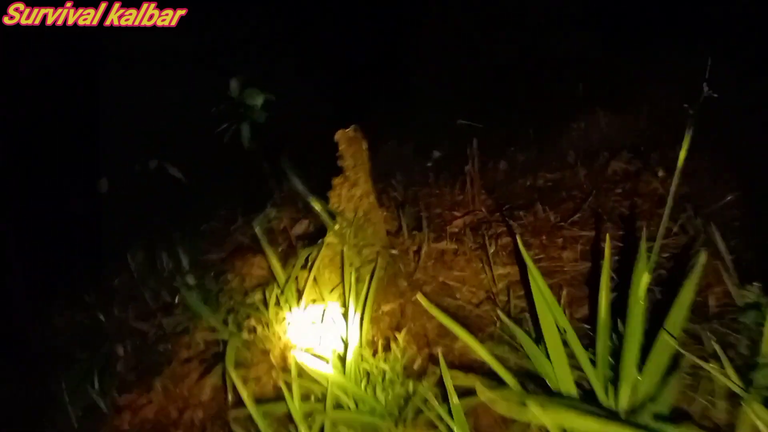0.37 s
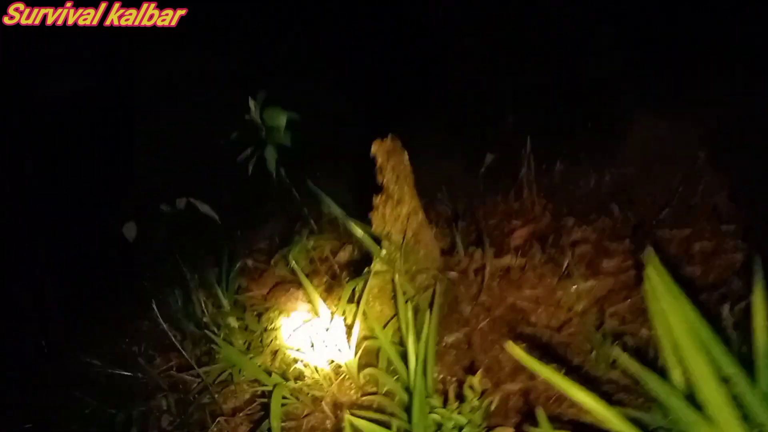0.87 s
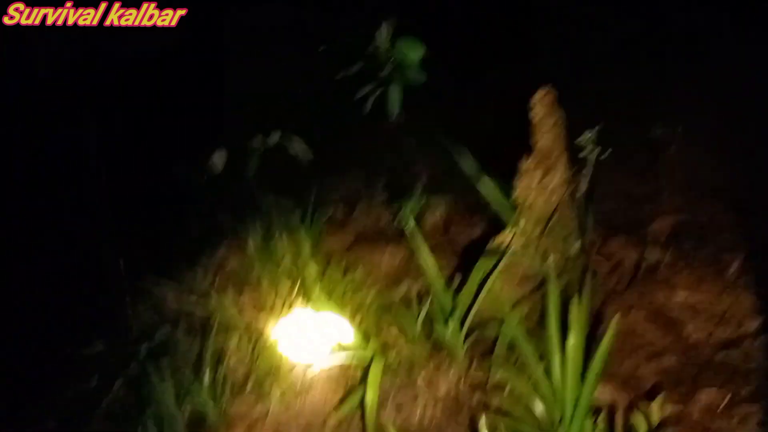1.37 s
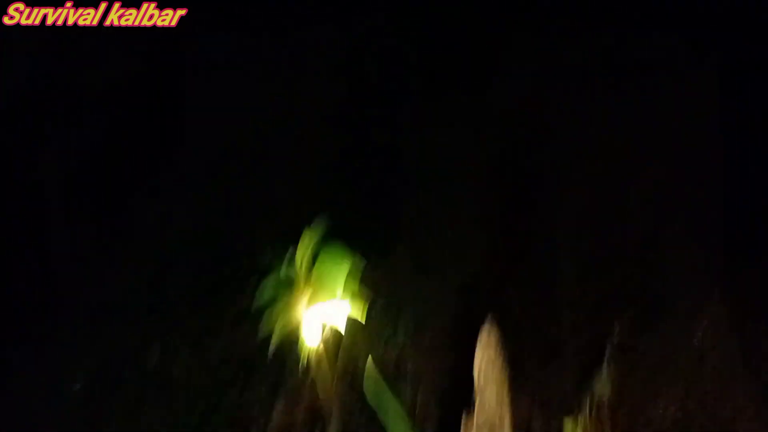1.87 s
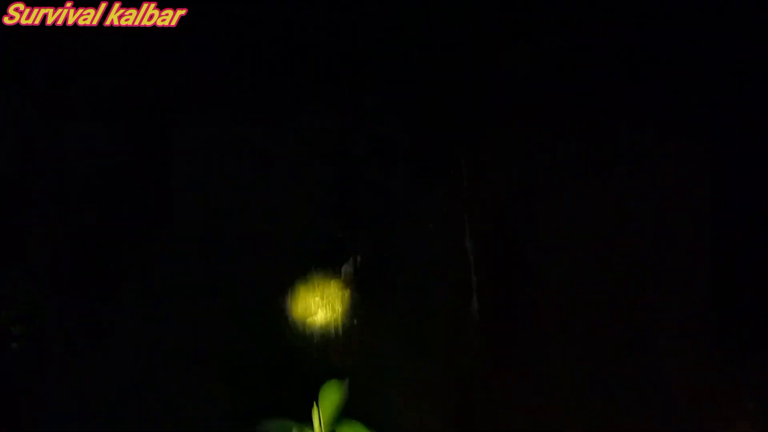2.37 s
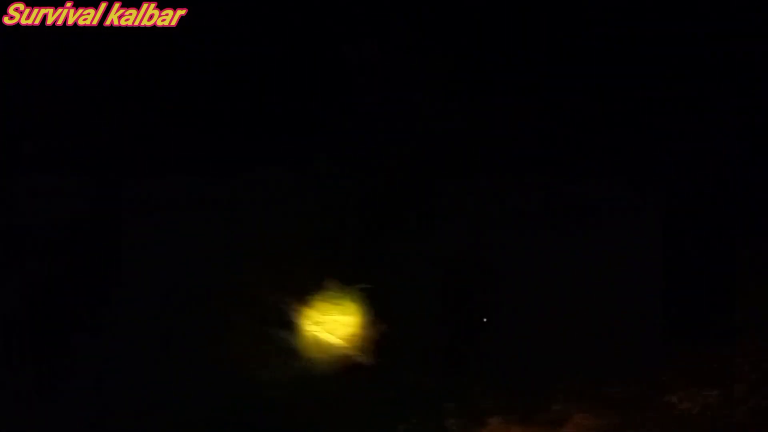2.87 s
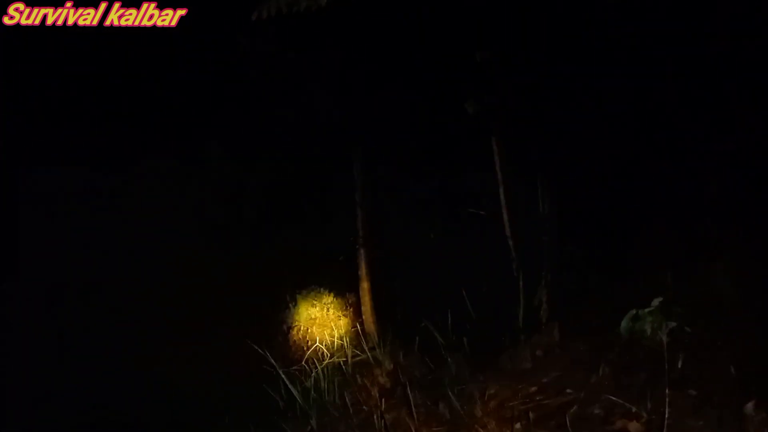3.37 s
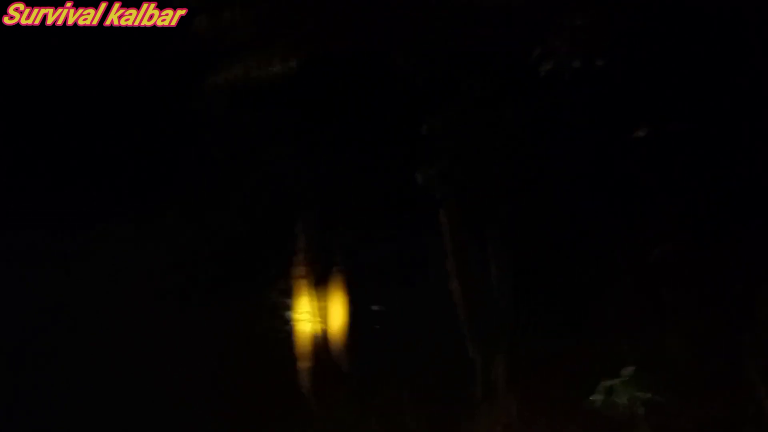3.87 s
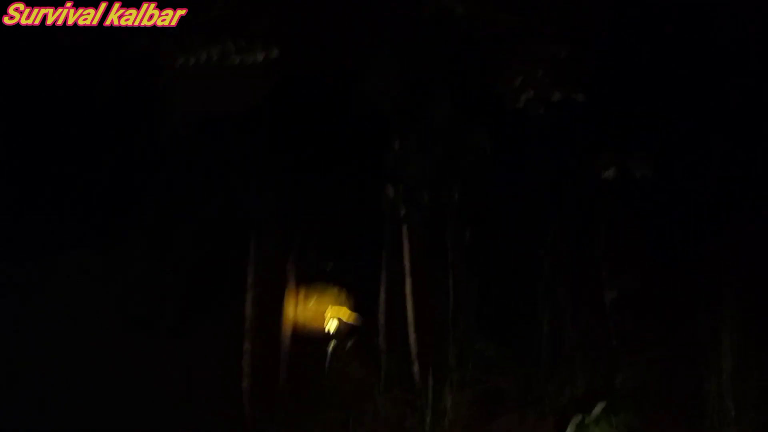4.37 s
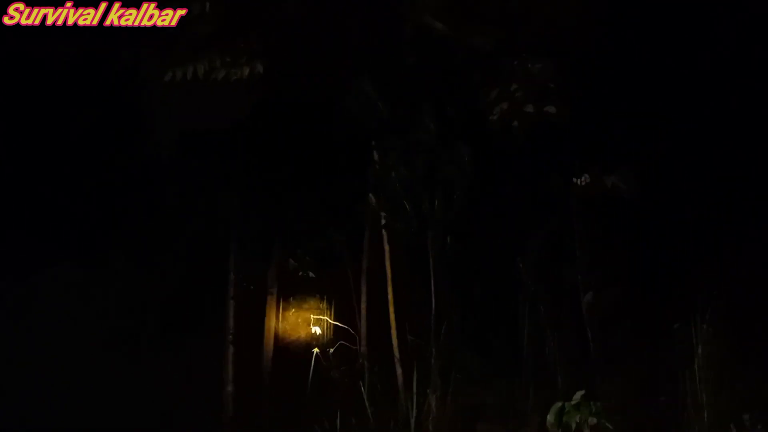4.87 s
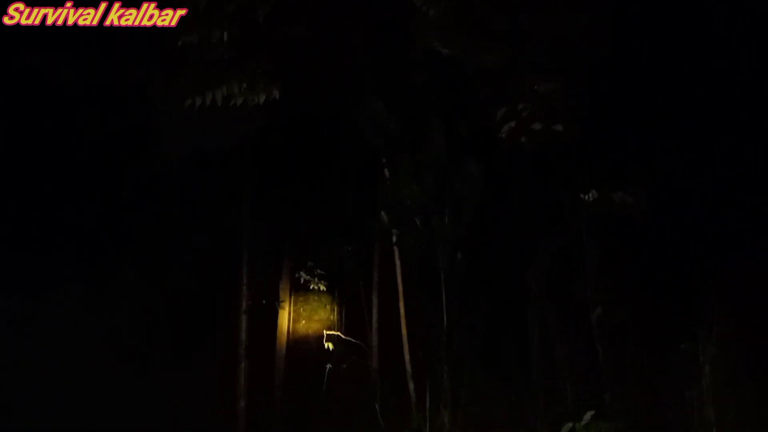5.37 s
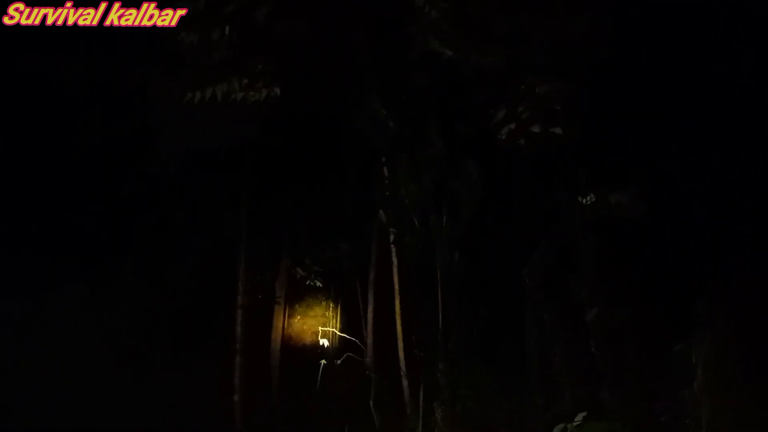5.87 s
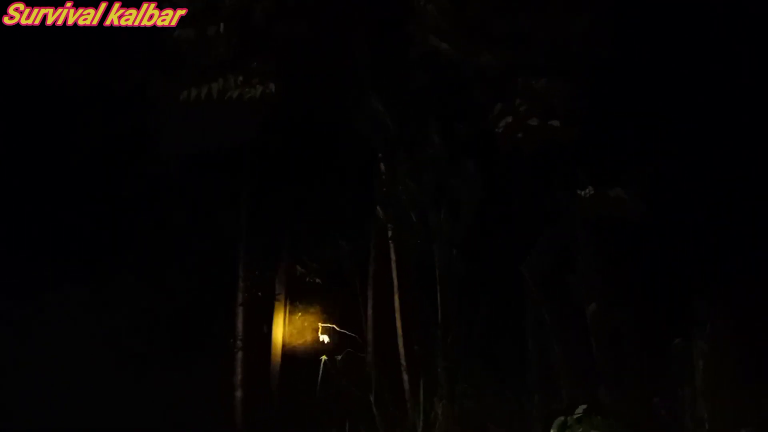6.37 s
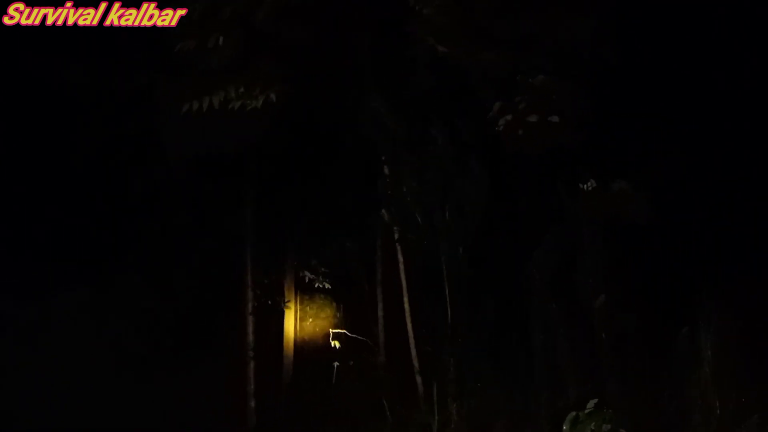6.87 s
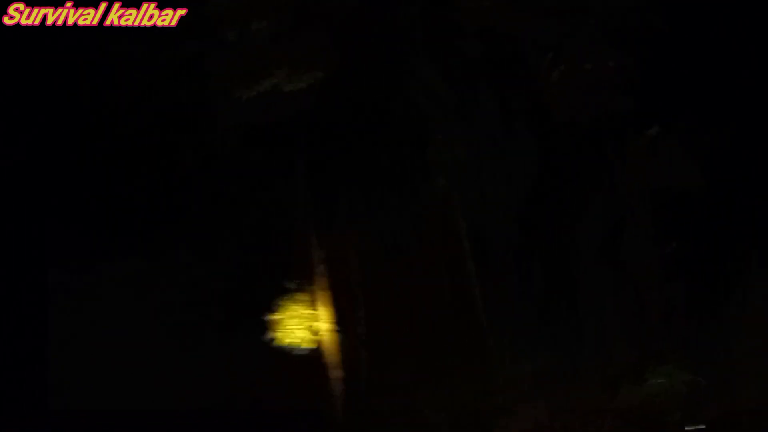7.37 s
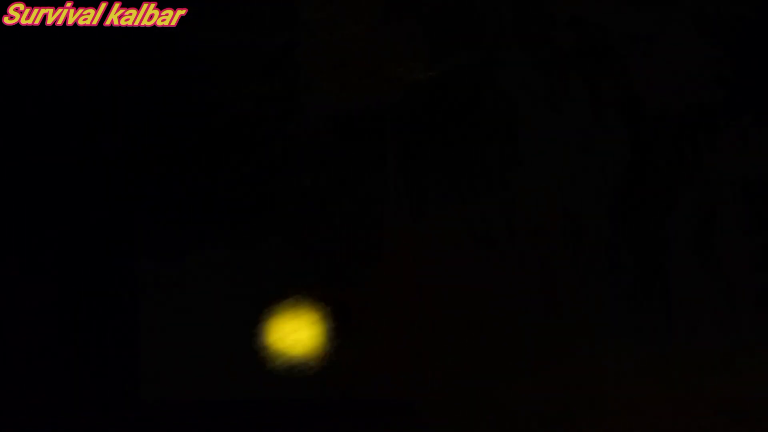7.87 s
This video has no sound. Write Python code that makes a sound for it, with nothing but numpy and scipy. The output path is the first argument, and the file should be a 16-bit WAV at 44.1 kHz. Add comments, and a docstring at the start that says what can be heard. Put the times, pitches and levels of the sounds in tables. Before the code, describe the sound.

Night forest, stereo outdoor pickup. Crickets trill constantly over a pulsing distant insect crowd, a katydid rasps in quick double buzzes, and a frog whistles a short falling note about every three quarters of a second, with a fainter answer. Early on, a close walker brushes leaves and snaps twigs, with dull handling bumps; this thins out by four seconds. A near cricket chirps rapidly at the start and end.

```python
"""A forest at night: frogs whistle falling notes, a katydid buzzes in pairs and crickets trill all through.
At first a walker brushes through the undergrowth: rubbed noise and grains, ringing twigs, low recorder jolts.
A near cricket chirps early and again late; a short frog croak, pulses into a throat, comes with each half.
Leaves squeak as thin gliding tones, once during the walk and again as the walker comes to rest.
Pulsed crowds of distant singers and coloured noise lie behind."""
import sys
import numpy as np
from scipy import signal
from scipy.io import wavfile
from scipy.ndimage import uniform_filter1d

SR = 44100
rng = np.random.default_rng(int(sys.argv[2]) if len(sys.argv) > 2 else 0)


def gain_from_db(level_db):
    """Convert decibel levels to linear amplitude factors (20 dB per decade)."""
    decades = np.asarray(level_db, float) / 20
    return 10 ** decades


def transcribe(u):
    """Save the signal u as a 16-bit wav file named by the first command-line argument.

    u: samples, shape (n,) or (channels, n), limited to [-1, 1]; the rate is SR.
    q: integer samples, one column per channel.
    """
    v = np.clip(np.atleast_2d(u).T, -1, 1)
    q = np.round(v * 32767).astype(np.int16)
    wavfile.write(sys.argv[1], SR, q)


N = 352800


def rms_one(x):
    """Scales a sound to an rms of 1."""
    return x / np.sqrt(np.mean(x ** 2) + 1e-20)


def in_time(rows):
    """Draws each column of a (t/s, ...) table as a line over the whole scene."""
    s, *columns = np.transpose(rows)
    return [np.interp(np.arange(N) / SR, s, c) for c in columns]


def at_hz(points, hz):
    """Reads a (f/Hz, value) curve on a logarithmic frequency axis."""
    f, value = np.transpose(points)
    return np.interp(np.log(hz), np.log(f), value)


def drift(rate_hz):
    """Random wander of rms 1: noise through two equal low-pass poles, made at every 40th sample."""
    pole = np.exp(-80 * np.pi * rate_hz / SR)
    noise = rng.standard_normal(N // 40 + 2002)
    slow = signal.lfilter([1], [1, -2 * pole, pole * pole], noise)[2000:]   # without the filter's start
    return np.interp(np.arange(N) / 40, np.arange(len(slow)), rms_one(slow))


def ring(clicks, hz, t60):
    """Two-pole resonator: a unit click starts a sine of height 1 that fades 60 dB in t60 seconds."""
    r = gain_from_db(-60 / (t60 * SR))
    w = 2 * np.pi * hz / SR
    return signal.lfilter([0, np.sin(w)], [1, -2 * r * np.cos(w), r * r], clicks + 1e-18)


def add(out, s, sound):
    """Mixes a short sound in at s seconds."""
    at = round(s * SR)
    out[..., at:at + sound.shape[-1]] += sound[..., :N - at]


def coloured(spectrum, source, alike, patchy_db):
    """Third-octave bands of mid and side noise, each with its own level, flicker and likeness; rms 1."""
    out = 0
    edges = 36 * 2 ** (np.arange(28) / 3)
    for k, (low, high) in enumerate(zip(edges, edges[1:])):
        band = signal.butter(2, [low, high], "band", fs=SR, output="sos")
        mid, side = signal.sosfilt(band, source[k % 2])   # neighbouring bands use different noise
        hz = np.sqrt(low * high)
        c = np.clip(alike(hz), -1, 1)   # left-right correlation
        gain = gain_from_db(at_hz(spectrum, hz) + patchy_db * drift(4.7))
        out = out + gain * (np.sqrt(1 + c) * mid + np.sqrt(1 - c) * side * [[1], [-1]])
    return rms_one(out)


def forest(x, build_s=.002):
    """Trunks and leaves scatter the sound into a diffuse tail, another one at each ear; energy 1."""
    t60_s = 0.77
    t = np.arange(SR) / SR
    tail = rng.standard_normal((2, SR)) * gain_from_db(-60 * t / t60_s) * (t > .006)
    tail = tail * (1 - np.exp(-t / build_s))
    return signal.fftconvolve(x[None], tail / np.sqrt(np.sum(tail ** 2) / 2), axes=1)[:, :N]


def frog_whistles():
    """A near-sine that falls fast at first, swells and stops; a farther, lower frog answers."""
    # near whistles: t/s, level/dB ahead of the swell
    whistle_rows = [(.305, -34), (.945, -30), (1.698, -27), (2.39, -26.5), (3.256, -27.5), (4.075, -27),
                    (4.783, -29), (5.578, -28), (6.298, -28.5), (7.098, -27), (7.81, -25.5)]
    # answers of the farther frog: t/s
    answer_times = [.02, 1.4, 2.92, 3.828, 5.246, 5.894, 6.988, 7.408]
    # the walker turns, the near frog moves left: t/s, lead of the left ear/ms
    turn_lead = [(0, 0.0089), (3.3, 0.28)]
    near_hz, far_hz = 2600, 2460   # first pitch of each caller
    answer_db, answer_lead_ms = -44.5, 0.068
    length_s, fall, swell_db = 0.2, .24, 13   # fall: share of the pitch lost
    out = np.zeros((2, N))
    u = np.arange(round(length_s * SR)) / SR / length_s   # 0 to 1 along the whistle
    swell = gain_from_db(swell_db * (u - 1)) * np.clip(u / 0.13, 0, 1) * np.clip((1 - u) / 0.51, 0, 1)
    calls = [(s, db, np.interp(s, *np.transpose(turn_lead)), near_hz) for s, db in whistle_rows]
    calls += [(s, answer_db, answer_lead_ms, far_hz) for s in answer_times]
    for s, db, lead_ms, hz in calls:
        pitch = hz * (1 - fall * u ** .75)
        lead = pitch * lead_ms / 1000 * np.array([[1], [0]])   # in cycles
        phase = 2 * np.pi * (np.cumsum(pitch) / SR + lead)
        add(out, s, gain_from_db(db) * swell * np.sin(phase))
    out = out * gain_from_db(2.5 * drift(25))   # the voice is unsteady
    return out + gain_from_db(-1.2) * forest(out[0], build_s=.05)   # echoes from farther trunks arrive later


def frog_croaks():
    """A few uneven pulses excite a throat, a narrow band-pass; heard mostly at the left."""
    # t/s, peak at the left/dB, throat f/Hz
    croak_rows = [(2.228, -25, 3250), (6.924, -26, 3100)]
    out = np.zeros((2, N))
    for s, db, hz in croak_rows:
        pulses = np.zeros(SR // 5)
        at = np.cumsum(rng.uniform(.0038, .0065, size=9)) * SR
        pulses[at.astype(int)] = np.hanning(11)[1:-1]   # the pulses grow, then shrink
        throat = signal.butter(4, [hz * .87, hz * 1.04], "band", fs=SR, output="sos")
        croak = signal.sosfilt(throat, pulses)
        croak *= gain_from_db(db) / np.abs(croak).max()
        add(out, s, np.array([croak, .3 * croak]))
    return out


def near_cricket():
    """Each chirp is one short tone whose pitch arches; the chirps of a run speed up a little."""
    # runs: first chirp t/s, number of chirps
    run_rows = [(.546, 20), (6.1165, 19)]
    # as heard by the turning walker, ahead of the echo: t/s, mean level of both ears/dB, left minus right/dB
    heard_rows = [(.5, -38.5, -9), (.83, -37.5, -8), (.92, -44, -2), (.99, -36.5, 0), (1.3, -37.5, -8),
                  (1.62, -46.5, -1), (1.9, -36.5, -8), (6.1, -36.5, 4), (7.1, -36, -0.5), (7.4, -46, -22)]
    chirp_s, top_hz, arch_hz = .017, 5083, 160   # arch: rough drop at both ends
    gap_s, hurry_s = .0704, .00005
    near = np.zeros(N)
    t = np.arange(round(chirp_s * SR)) / SR
    shape = np.clip(t / 0.004, 0, 1) * np.clip((chirp_s - t) / 0.0014, 0, 1)
    arch = 2 * np.pi * np.cumsum(top_hz - arch_hz * (2 * t / chirp_s - .9) ** 2) / SR
    for first, count in run_rows:
        for k in range(count):
            add(near, first + k * gap_s - k * k * hurry_s, shape * np.sin(arch))
    db, side_db = in_time(heard_rows)
    near, side = near * gain_from_db(db), gain_from_db(side_db / 2)
    return np.array([near * side, near / side]) + gain_from_db(-4.5) * forest(near)


def far_crickets():
    """Each wing stroke is a short rising tone; strokes repeat evenly while a bout lasts."""
    # wing f/Hz, strokes per s, bouts [(start t/s, end t/s, level/dB ahead of panning and echo)]
    trill_rows = [(5606, 46.5, [(.3, 2.2, -52), (2.1, 3.65, -48), (5.3, 7.35, -51), (7.25, 8.2, -45)]),
                  (5334, 46.3, [(-.2, 3.9, -52), (6.3, 8.2, -51)]), (5480, 46.8, [(2.9, 5.5, -52.5)]),
                  (4520, 14.2, [(3.55, 4.66, -47.5)]), (4570, 60, [(4.25, 5.1, -57)]),
                  (6290, 60, [(7.03, 7.66, -55)])]
    t, far = np.arange(N) / SR, np.zeros(N)
    for (hz, per_s, bouts), start_phase in zip(trill_rows, rng.random(len(trill_rows))):
        stroke = (per_s * (t - bouts[0][0])) % 1   # 0 to 1 from stroke to stroke
        gate = np.sin(np.pi * np.clip(stroke / min(.6, .026 * per_s), 0, 1))
        bout = 0
        for start, end, db in bouts:
            bout = bout + np.clip(np.minimum(t - start, end - t) / 0.15, 0, 1) * gain_from_db(db)
        bout = bout * gain_from_db(0.98 * drift(12.0))
        rise = 5000 * (stroke / per_s - .009) ** 2   # in cycles: the pitch climbs 10 Hz per ms
        far += bout * gate * np.sin(2 * np.pi * (hz * t + rise + start_phase) + .9 * drift(6))
    return np.array([1.5 * far, -.3 * far]) + gain_from_db(1) * forest(far)


def katydid():
    """A file is drawn over a scraper twice: rough noise around a wing resonance that rises in each stroke."""
    # first buzz of each pair: t/s
    buzz_times = [0.0508, 0.662, 1.0303, 1.79, 2.378, 2.6738, 3.3137, 3.919, 4.194, 4.828, 5.3725, 5.685,
                  6.333, 6.639, 7.248, 7.7715]
    # as heard by the turning walker: t/s, level/dB ahead of roughness and panning
    heard_rows = [(0, -42), (2.4, -36), (4.3, -39), (5.4, -40.5), (8, -37)]
    pair_gap_s = .088
    out, t = np.zeros(N), np.arange(round(0.069 * SR)) / SR
    shape = np.clip(t / 0.0058, 0, 1) * np.clip((.058 - t) / 0.017, 0, 1)
    rise = 2 * np.pi * np.cumsum(10050 - 600 * np.exp(-t / 0.0141)) / SR
    rough = signal.butter(4, 600, fs=SR, output="sos")
    for s, noise in zip(buzz_times, rng.standard_normal((len(buzz_times), 2, 2, len(t)))):
        gain = gain_from_db(np.interp(s, *np.transpose(heard_rows)))
        for lag, (a, b) in zip((0, pair_gap_s), signal.sosfilt(rough, noise)):
            add(out, s + lag, gain * shape * ((0.24 + a) * np.sin(rise) + b * np.cos(rise)))
    return (out + gain_from_db(-9) * forest(out)) * gain_from_db([[1], [-1]])


def snaps():
    """Twigs and dry stems: a bright crack of a millisecond or two, with the dull ring of the stem."""
    # t/s, body level/dB, body f/Hz, crack level/dB; levels ahead of modes, filter and panning
    snap_rows = [(0.3292, -41, 1530, -35), (0.398, -34.5, 810, -23.5), (0.437, -14.5, 638, -10),
                 (0.448, -29, 544, -40), (0.4905, -34, 860, -9.5), (0.518, -32, 596, -25),
                 (0.668, -43, 1790, -25), (1.039, -45, 544, -22.5), (1.097, -34.5, 805, -25),
                 (1.284, -38, 870, -24), (1.332, -42, 713, -23), (1.753, -39, 1660, -29),
                 (2.259, -41, 1190, -28), (2.569, -29.5, 1290, -23), (3.135, -33, 720, -29),
                 (3.274, -34.5, 620, -27), (3.36, -48, 910, -36), (3.551, -38, 519, -39),
                 (3.831, -40.5, 1080, -33)]
    # stem modes: multiple of body f, level/dB, cycles to fade 60 dB
    stem_modes = [(1, 2.5, 7.5), (1.7, 5, 3.5), (2.9, -6, 20), (4.6, -5, 20)]
    out, t = np.zeros((2, N)), np.arange(round(0.054 * SR)) / SR
    click = 1. * (t == 0)
    bright = signal.butter(1, 6000, "high", fs=SR, output="sos")
    fall = np.exp(-t / .0005) + .1 * np.exp(-t / .005)
    for (s, body_db, hz, crack_db), noise in zip(snap_rows, rng.standard_normal((len(snap_rows), 3, len(t)))):
        body = 0
        for n, (k, db, cycles) in enumerate(stem_modes):
            body = body + (-1) ** n * gain_from_db(db) * ring(click, k * hz, cycles / (k * hz))
        burst = (noise[0] + .5 * noise[1:]) * fall   # one noise at both ears, another at each
        crack = signal.sosfilt(bright, burst) * gain_from_db(crack_db)
        add(out, s + 0.001206, (gain_from_db(body_db) * body + crack) * gain_from_db([[2.2], [-2.2]]))
    return out


def brushing():
    """Leaves and stems slide past in strokes: noise mixed with dense uneven grains."""
    # strokes: t/s, length/s, low rustle level/dB, leaf swish level/dB; ahead of flutter, blades and panning
    stroke_rows = [(0, 0.06, -46, -54), (0.184, 0.21, -51.5, -54.5), (0.374, 0.25, -40.5, -47.5),
                   (0.665, 0.086, -49.5, -64), (0.877, 0.41, -46.5, -49.5), (1.196, 0.23, -50, -48),
                   (1.461, 0.28, -46, -46), (1.793, 0.15, -45.5, -56), (2.186, 0.22, -57, -55.5),
                   (2.518, 0.15, -53, -54), (3.185, 0.46, -60.5, -50.5), (3.51, 0.15, -45, -55),
                   (3.792, 0.11, -54.5, -58)]
    # faint rustle until the walker stands still: t/s, level/dB
    settling_rows = [(2, -59), (4.6, -63.5), (5.2, -74.5)]
    # colour of the low rustle: f/Hz, relative level per Hz/dB
    rustle_colour = [(100, 5), (600, 6), (1500, 1.5), (4000, 3), (9000, -76)]
    # colour of the leaf swish: f/Hz, relative level per Hz/dB
    swish_colour = [(2000, -75), (7000, 3), (10300, -0.5), (13000, 1), (16400, 0.5)]
    # stiff blades hiss most in this band: low f/Hz, high f/Hz
    blade_band = [11700, 12670]
    low, high = np.zeros((2, N))
    for s, length, low_db, high_db in stroke_rows:
        stroke = np.sin(np.pi * np.linspace(0, 1, round(length * SR)) ** .8)
        add(low, s, gain_from_db(low_db) * stroke)
        add(high, s, gain_from_db(high_db) * stroke)
    between = gain_from_db(in_time(settling_rows)[0])
    flutter = gain_from_db(2.5 * drift(25))   # contact pressure changes all bands together
    sizes = gain_from_db(5.5 * np.minimum(rng.exponential(1, (2, 2, N)), 5)) * rng.choice([-1, 1], (2, 2, N))
    grains = rms_one(sizes * (rng.random(N) < 400 * flutter / SR))   # about 400 per s
    hiss = rng.standard_normal((2, 2, N))
    grainy, smooth = flutter * (.8 * grains + hiss), flutter * (.55 * grains + hiss)
    rustle = (low + between) * coloured(rustle_colour, grainy, lambda hz: .7, patchy_db=1)
    swish = (high + between) * coloured(swish_colour, smooth[::-1], lambda hz: .6, patchy_db=2)
    blades = signal.sosfilt(signal.butter(1, blade_band, "band", fs=SR, output="sos"), swish)
    return (rustle + swish + 1.5 * blades) * gain_from_db([[1.7], [-1.7]])


def jolts():
    """The grip knocks the left port of the recorder: a couple of low cycles."""
    # t/s, level/dB ahead of the envelope
    jolt_rows = [(0.06, -28.5), (0.347, -29), (0.544, -20), (1.894, -32.5), (2.059, -32.5), (3.188, -30)]
    out, t = np.zeros((2, N)), np.arange(round(.09 * SR)) / SR
    knock = np.sin(2 * np.pi * 78 * t) * (t / 0.023) * np.exp(1 - t / 0.0081)
    for s, db in jolt_rows:
        add(out, s, gain_from_db(db) * knock * [[1], [.08]])
    return out


def squeaks():
    """A waxy blade slips along another at the left: thin wavering tones that follow the pressure."""
    # level/dB ahead of wavering and panning, glide [(t/s, f/Hz)]
    squeak_rows = [(-54, [(2.18, 13100), (2.215, 11900), (2.245, 12900), (2.275, 11700)]),
                   (-44.5, [(4.335, 12000), (4.375, 12500), (4.43, 13500)]), (-55, [(4.385, 11400),
                   (4.43, 12300), (4.5, 11800)]), (-56, [(4.395, 14100), (4.435, 14700), (4.56, 11800)])]
    left_db, edge_s = 10.5, .015   # left minus right; fade at both ends
    out = np.zeros(N)
    for db, glide in squeak_rows:
        s, hz = np.transpose(glide)
        t = np.arange(s[0], s[-1], 1 / SR)
        pitch = uniform_filter1d(np.interp(t, s, hz), size=600) + 60 * drift(40)[:len(t)]
        fade = np.clip(np.minimum(t - s[0], s[-1] - t) / edge_s, 0, 1)
        add(out, s[0], gain_from_db(db) * fade * np.sin(2 * np.pi * np.cumsum(pitch) / SR))
    return out * gain_from_db(3.3 * drift(50)) * gain_from_db([[left_db / 2], [-left_db / 2]])


def chorus(first_hz, last_hz, per_s, db):
    """A crowd all round: fast even pulses ring, each singer with its own pitch, rate and direction."""
    out = np.zeros((2, N))
    for hz, (b, c) in zip(np.linspace(first_hz, last_hz, num=16), rng.standard_normal((16, 2))):
        cycles = np.cumsum(per_s * (1 + .008 * b + .03 * drift(9))) / SR
        pulses = np.diff(np.floor(cycles), prepend=0) * gain_from_db(3.4 * drift(2.7) + 5.4 * drift(60))
        place = (2 * hz - first_hz - last_hz) / (last_hz - first_hz)   # -1 to 1 across the range
        pulses *= gain_from_db(-5 * (place + 0.24) ** 2)   # the singers near mid-range are loudest
        voice = ring(ring(pulses, hz, .02), hz, .02)
        out += [voice, 0.47 * np.roll(voice, round(7 + 3 * c))]   # the right ear hears it later, as a rule
    return gain_from_db(db) * rms_one(out + gain_from_db(-1.0) * forest(out[0]))


def crowds():
    """Several crowds of distant singers, each in its own pitch range, sound together."""
    # first singer f/Hz, last singer f/Hz, pulses per s, rms level/dB
    crowd_rows = [(2842, 3330, 117.0, -46), (4833, 5640, 47.0, -55), (10030, 9700, 120, -60)]
    return sum(chorus(*row) for row in crowd_rows)


def night_air():
    """Distant insects and night air: steady noise, coloured and spread band by band."""
    # f/Hz, relative level per Hz/dB
    air_colour = [(40, -56), (80, 0), (200, 0.5), (350, -9.5), (1300, -15.5), (2100, 1.5), (4100, -5),
                  (5000, 1), (6300, -17), (7200, -14), (8600, 1), (10300, -11), (11000, -18),
                  (16000, -15.5)]
    # f/Hz, left-right likeness (correlation, -1 to 1)
    likeness = [(60, 0.8), (200, 0.6), (2500, -0.086), (5500, -0.33), (7500, 0.9)]
    noise = rng.standard_normal((2, 2, N))
    air = coloured(air_colour, noise, lambda hz: at_hz(likeness, hz), patchy_db=1.3)
    return gain_from_db(-50) * air * gain_from_db([[.8], [-.8]])


def scene():
    """All singers, the walker and the night air."""
    frogs = frog_whistles() + frog_croaks()
    insects = near_cricket() + far_crickets() + katydid()
    walker = snaps() + brushing() + jolts() + squeaks()
    return frogs + insects + walker + crowds() + night_air()


def band_limit(x):
    """A steep low-pass at the top of the band."""
    return signal.sosfilt(signal.butter(12, 17000, fs=SR, output="sos"), x)


def record(dry):
    """Small microphones lose the bass, and a steep filter cuts the top."""
    bass_cut = signal.butter(2, 55, "high", fs=SR, output="sos")
    top_cut = signal.cheby2(20, 50, 16000, fs=SR, output="sos")
    mix = signal.sosfilt(top_cut, signal.sosfilt(bass_cut, dry))
    return band_limit(mix)


dry = scene()
out = record(dry)
transcribe(out)
```